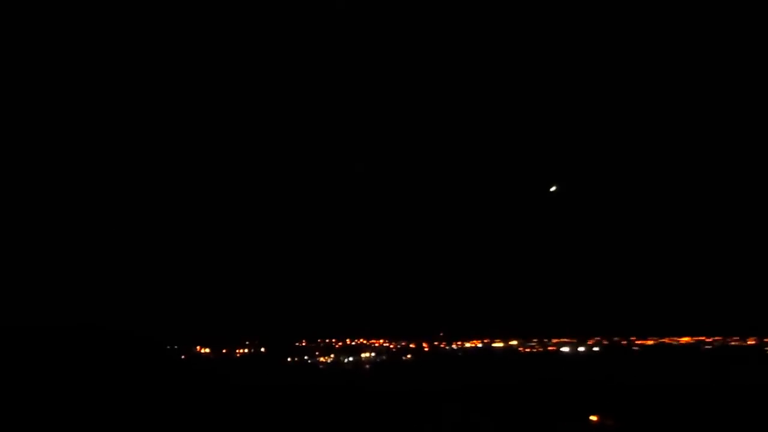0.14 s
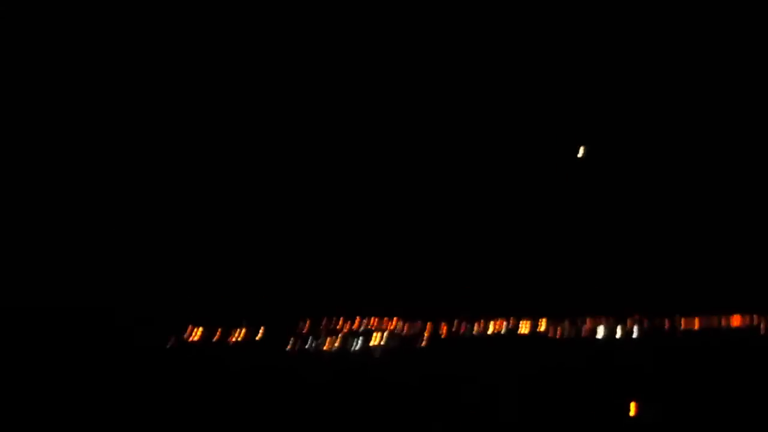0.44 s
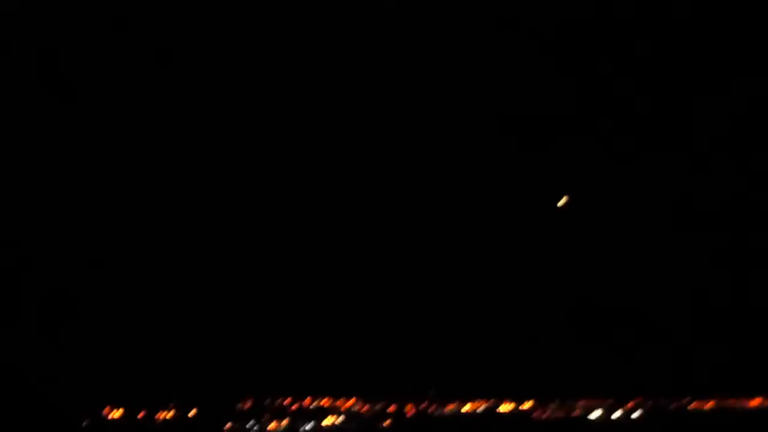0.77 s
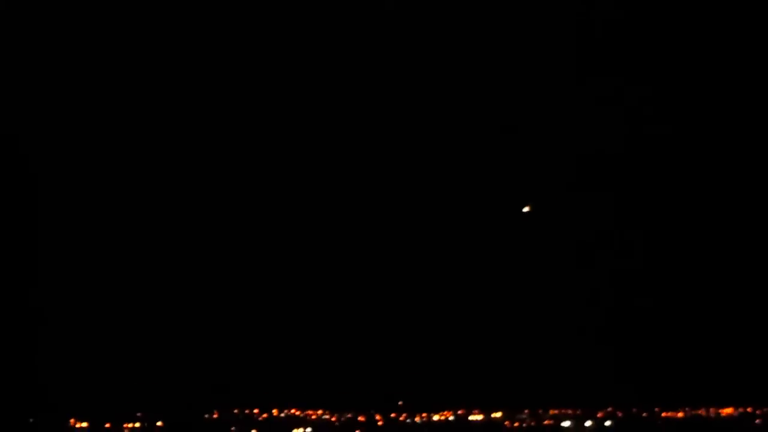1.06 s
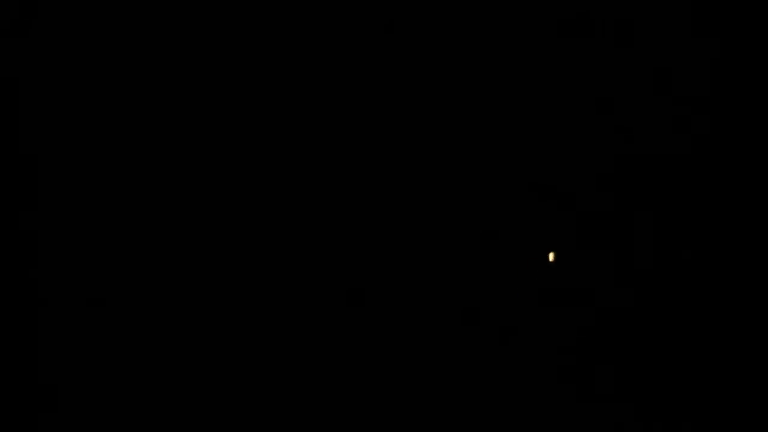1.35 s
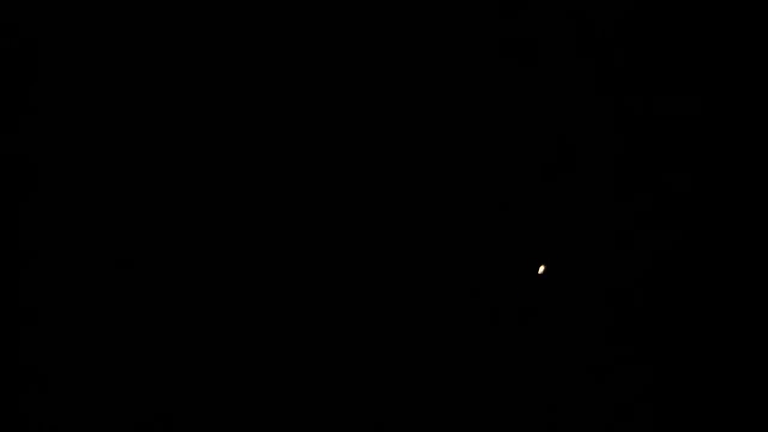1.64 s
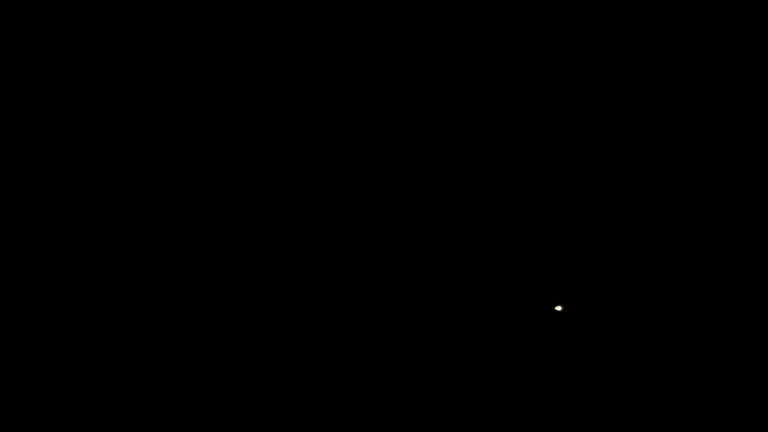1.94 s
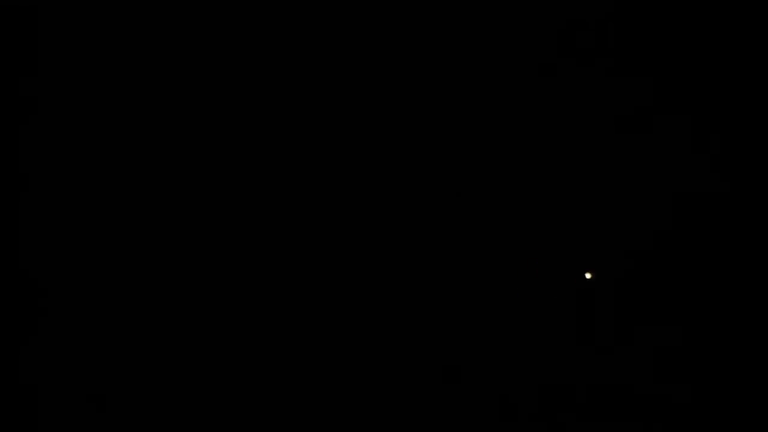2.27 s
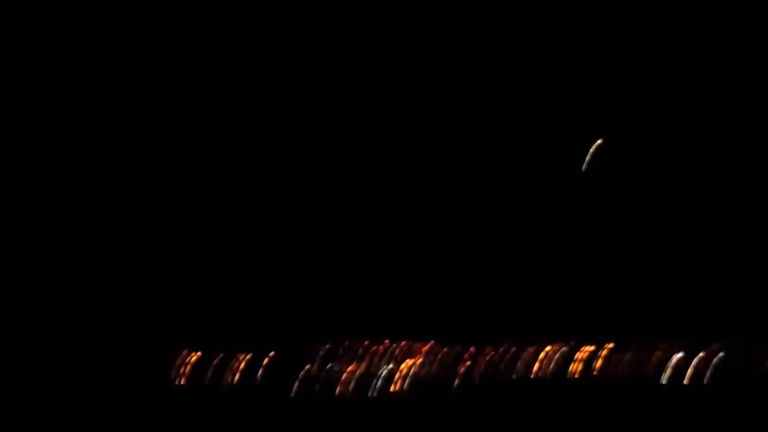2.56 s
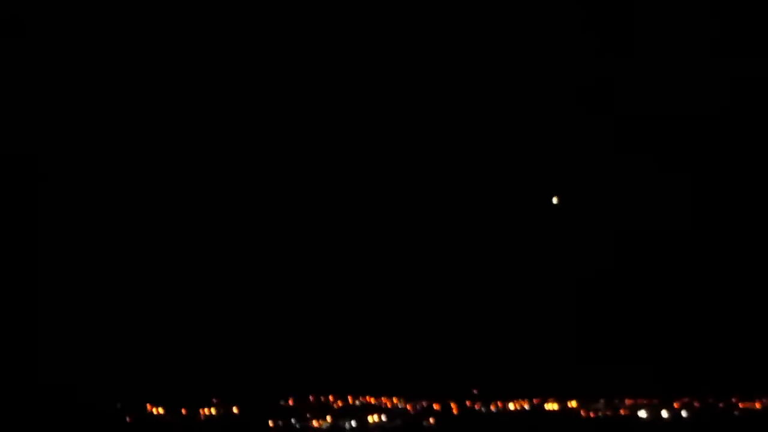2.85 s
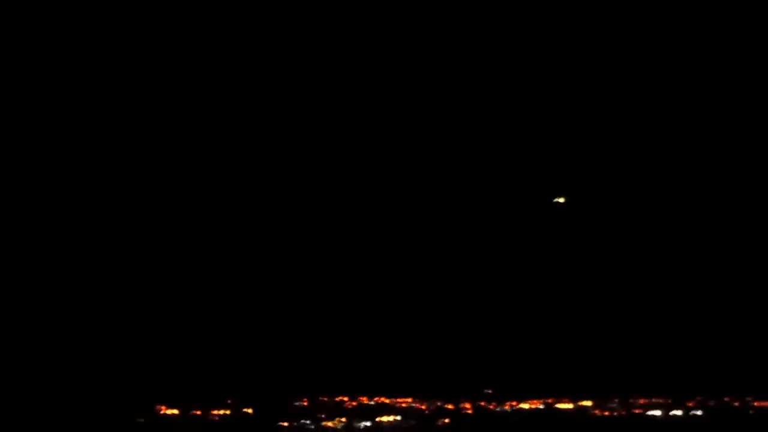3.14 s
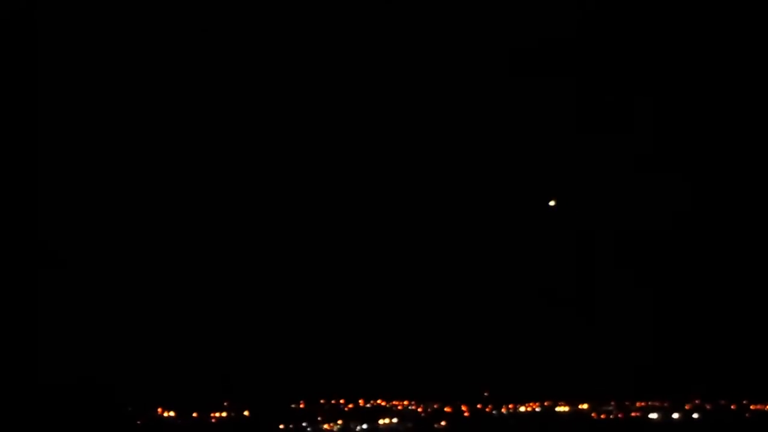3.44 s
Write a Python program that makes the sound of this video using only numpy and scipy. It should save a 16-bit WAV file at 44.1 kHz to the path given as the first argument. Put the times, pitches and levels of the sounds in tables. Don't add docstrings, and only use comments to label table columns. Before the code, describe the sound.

A camera's small zoom motor whirs with a buzzy gear whine among taps and ticks, stops just after one second, then finger taps, a hard knock and a loud latch snap, close on the built-in microphone, quiet hiss behind.

```python
import sys
import numpy as np
from scipy import signal
from scipy.io import wavfile

SR = 44100
rng = np.random.default_rng(int(sys.argv[2]) if len(sys.argv) > 2 else 0)


def level_to_linear(level):
    exponent = np.asarray(level, float) / 20
    return 10 ** exponent


def transcribe(u):
    v = np.clip(np.atleast_2d(u).T, -1, 1)
    q = np.round(v * 32767).astype(np.int16)
    wavfile.write(sys.argv[1], SR, q)


N = 158760

# pitch in Hz, density in dB per Hz.
HISS_COLOUR = [(120, 0.2), (250, -3.5), (600, -9), (1500, -14.5), (4000, -18), (9800, -21), (12000, -31)]
# time in seconds, rumble level in dB.
PALM_LEVEL = [(0, -52.5), (.28, -48.5), (.45, -48), (.7, -46.5), (.85, -45), (1.0, -61), (1.3, -54),
              (1.5, -59), (1.85, -57), (2.05, -56.5), (3.2, -57), (3.32, -51), (3.45, -60), (3.6, -62)]
# time in seconds, level in dB.
MOTOR_LEVEL = [
    (0, -45.5),
    (.35, -47),
    (.65, -45),
    (.8, -44.5),
    (.95, -50),
    (1.1, -45.5),
]
BRUSH_STRENGTH = [-3.3, -5.5, -2, -5, -5.5, -4]
# pitch in Hz, width in Hz, level in dB.
BARREL_MODES = [(317, 270, -4.5), (650, 440, -5.5), (1200, 240, 2.5), (1450, 163, 2), (1890, 310, -1),
                (2985, 290, -3), (3740, 500, -10), (4480, 360, -6.5), (5300, 1000, -13.5),
                (6210, 370, -4.5), (6900, 340, -3.5), (7410, 330, -6), (9200, 2800, -18)]
# start in seconds, end in seconds, level in dB at start, level in dB at end.
GRIP_SQUEEZES = [
    (1.83, 1.944, -55, -61.5),
    (2.92, 3.049, -65, -61),
    (3.068, 3.242, -62.5, -46.5),
]
# start in seconds, level in dB, T60 in seconds.
BODY_RINGS = [
    (.27, -42.5, 0.39),
    (0.768, -43, 0.95),
    (.94, -50.5, 1),
    (1.262, -34, 0.54),
    (2.181, -46, 0.41),
    (2.619, -30, 0.38),
    (3.28, -39.5, 0.37),
    (3.349, -40.5, 0.49),
]
# pitch in Hz, level in dB.
SHELL_MODES = [(330, -5.5), (430, -10), (620, 2), (810, -0.5), (990, -1.5), (1104, -0.7), (1297, 1),
               (1490, -1), (1900, 4)]
# start in seconds, peak in dB, centre in Hz, T60 in seconds, contact in seconds.
FINGER_TAPS = [(.12, -33, 920, .02, 0.0036), (.261, -27.5, 440, 0.034, 0.0079),
               (0.2716, -23, 950, 0.026, 0.0033), (.436, -34.5, 590, .012, 0.00086),
               (0.77, -27, 610, 0.015, .004), (.941, -29.5, 1110, .02, 0.0026),
               (.977, -28, 930, 0.036, 0.0056), (1.2628, -18, 646, 0.042, 0.0035),
               (1.335, -23, 818, 0.019, 0.0085), (1.343, -31.5, 750, 0.046, .05),
               (1.748, -40.5, 700, 0.026, 0.0051), (1.798, -42.5, 583, 0.025, 0.0043),
               (1.889, -32.5, 670, .015, 0.0016), (2.13, -51, 650, .02, 0.0044),
               (2.1807, -23.5, 820, 0.021, 0.0027), (2.6195, -5.5, 1110, 0.016, 0.0041),
               (2.629, -26.5, 887, 0.023, 0.017), (2.649, -30, 825, 0.022, 0.029),
               (2.749, -38, 1070, .015, 0.0049), (3.028, -35.5, 760, 0.023, 0.0024),
               (3.221, -31.5, 960, 0.027, 0.014), (3.2369, -22.5, 1030, 0.073, .012),
               (3.279, -24, 891, 0.034, 0.03), (3.351, -24, 900, 0.024, 0.028)]
SEAM_MODES = [2050, 2696, 3263, 3730, 3930, 4225, 4570, 5860, 6070, 6710, 7870, 8060, 9680, 9440]
# start in seconds, peak in dB, centre in Hz, T60 in seconds.
SHARP_TICKS = [(.250, -16, 3110, 0.0075), (0.2713, -8.5, 3900, 0.013), (0.748, -32, 6000, .01),
               (0.7708, -29, 5660, 0.0076), (.81, -30.5, 5800, 0.009), (.859, -22.5, 6300, .008),
               (1.133, -37.5, 3000, .01), (1.2618, -18, 2600, 0.017), (1.8902, -26, 3770, 0.0077),
               (1.926, -34.5, 3000, 0.011), (2.1805, -17, 2460, 0.012), (2.6196, -17.5, 2730, 0.022),
               (3.028, -36.5, 3970, .012), (3.180, -29, 3520, 0.0073), (3.232, -25, 3000, 0.039),
               (3.3319, -26.5, 3000, 0.01)]


def one(x):
    return x / np.sqrt(np.mean(x ** 2) + 1e-20)


def to_peak(x, db):
    return x * level_to_linear(db) / np.abs(x).max()


def drift(rate_hz):
    r = np.exp(-2 * np.pi * rate_hz / SR)
    return one(signal.lfilter([1], [1, -2 * r, r * r], rng.standard_normal(N + SR))[SR:])


def peak(x, hz, width_hz):
    r = np.exp(-np.pi * width_hz / SR)
    poles = [1, -2 * r * np.cos(2 * np.pi * hz / SR), r * r]
    return signal.lfilter([(1 - r * r) / 2, 0, (r * r - 1) / 2], poles, x)


def band(x, low_hz, high_hz):
    return signal.sosfilt(signal.butter(2, [low_hz, high_hz], "band", fs=SR, output="sos"), x)


def rings(hz, db, t60):
    t = np.arange(int(.08 * SR))[:, None] / SR
    decay = level_to_linear(db - 60 * t / np.maximum(t60, .002))
    return (decay * np.sin(2 * np.pi * hz * t)).sum(axis=1)


def add(out, s, x):
    i = int(s * SR)
    out[i:i + len(x)] += x[:N - i]


def near(hz, centre_hz, octaves):
    return -6 * (np.log2(hz / centre_hz) / octaves) ** 2


def hiss():
    edges = 90 * 2 ** np.arange(0, 7.4, 1 / 6)
    white = rng.standard_normal((2, N))
    hz, db = np.transpose(HISS_COLOUR)
    out = np.zeros(N)
    for k, (low, high) in enumerate(zip(edges, edges[1:])):
        gain = level_to_linear(np.interp(np.log(low * high) / 2, np.log(hz), db))
        out += gain * band(white[k % 2], low, high)
    return level_to_linear(-51) * one(out)


def hand():
    s, db = np.transpose(PALM_LEVEL)
    white = rng.standard_normal((3, N))
    rumble = one(band(white[0], 18, 92)) * level_to_linear(2.6 * drift(6.3))
    rub = level_to_linear(-6 + 2.0 * drift(13)) * one(peak(white[1], 404, 430))
    hum = level_to_linear(-60.5) * one(peak(white[2], 210.4, 9))
    return level_to_linear(np.interp(np.arange(N) / SR, s, db)) * (rumble + rub) + hum


def motor():
    segments, turns_per_s, first_turn_s = 6, 44.37, .0192
    stop_s, coast_s, mesh_hz = 1.106, .006, 1460
    t = np.arange(N) / SR
    turns = (t - first_turn_s) * turns_per_s + .006 * drift(60)
    step = np.floor(turns * segments).astype(int)
    uneven_db = 1.2 * rng.standard_normal(2000)[step % 2000]
    strength = level_to_linear(np.array(BRUSH_STRENGTH)[step % segments] + uneven_db)
    puff = 0.33 + strength * np.exp(-(turns * segments - step) / 0.43)
    clicks = one(strength * np.diff(step, prepend=step[0]))
    brushes = one(puff * rng.standard_normal(N)) + level_to_linear(-4) * clicks
    rotor = one((1 + puff) * rng.standard_normal(N))

    whir = np.zeros(N)
    for k, (hz, width_hz, db) in enumerate(BARREL_MODES):
        source = brushes if hz > 2500 else rotor
        mode = peak(peak(source, hz, width_hz), hz, 4.0 * width_hz)
        whir += level_to_linear(db) * (-1) ** k * mode
    whir = one(whir)
    for hz, tone_db in ((mesh_hz, -11.5), (mesh_hz - segments * turns_per_s, -13.5)):
        level = level_to_linear(tone_db + 2.5 * drift(25))
        whir = whir + level * np.sin(2 * np.pi * hz * t + .6 * drift(5.7))
    s, db = np.transpose(MOTOR_LEVEL)
    return whir * level_to_linear(np.interp(t, s, db)) * np.exp(-np.maximum(t - stop_s, 0) / coast_s)


def creaks():
    slips_per_s, seam_hz, fade_s = 2400, 3910, 0.0093
    t, env = np.arange(N) / SR, np.zeros(N)
    for start, end, start_db, end_db in GRIP_SQUEEZES:
        fade = np.clip(np.minimum(t - start, end - t) / fade_s, 0, 1)
        env += level_to_linear(np.interp(t, [start, end], [start_db, end_db])) * fade
    slips = (rng.random(N) < slips_per_s / SR) * rng.standard_normal(N) * level_to_linear(2.1 * drift(40))
    seam = one(peak(peak(slips, seam_hz, 420), seam_hz, 1500))
    shell = one(peak(slips, 700, 670))
    return env * (seam + level_to_linear(1.5) * shell)


def body_ring():
    out, t = np.zeros(N), np.arange(SR // 2) / SR
    for s, db, t60 in BODY_RINGS:
        rise = 1 - np.exp(-t / 0.0024)
        add(out, s, level_to_linear(db - 60 * t / t60) * rise * np.sin(2 * np.pi * 166.4 * t))
    add(out, 3.345, rings(118, -38, .2) * np.hanning(int(.08 * SR)))
    return out


def tap(centre_hz, t60, length):
    hz, db = np.transpose(SHELL_MODES)
    x, modes = np.zeros(SR // 4), hz * (1 + 0.046 * rng.standard_normal(len(hz)))
    modes[np.argmin(abs(np.log(hz / centre_hz)))] = centre_hz
    struck_db = db + 7 * (modes == centre_hz)
    for k in range(10):
        share = k / 7
        timing, loudness = rng.standard_normal(2)
        touch_db = 1.7 * loudness - 11 * share + 3.86 * rng.standard_normal(len(hz))
        dull_db = near(modes, centre_hz * (1 - 0.42 * share), 0.7)
        touch = np.sign(timing) * rings(modes, struck_db + touch_db + dull_db, t60)
        add(x, abs(length * share * (1 + .1 * timing)), touch)
    return band(x, 220, 3000)


def taps():
    out = np.zeros(N)
    for s, peak_db, centre_hz, t60, length in FINGER_TAPS:
        add(out, s, to_peak(tap(centre_hz, t60, length), peak_db))
    return out


def tick(db, centre_hz, octaves, t60):
    hz = np.array(SEAM_MODES)
    scatter, strength = rng.standard_normal((2, len(hz)))
    modes = hz * (1 + 0.023 * scatter) * np.sign(strength)
    mode_db = db + near(hz, centre_hz, octaves) + 4.3 * strength
    x = rings(modes, mode_db, t60 * (4000 / hz) ** 0.52)
    x += rings(centre_hz, db + 8.0, t60)
    grit = rng.standard_normal(40)
    x[:37] += level_to_linear(db - 5.5) * (grit[3:] - grit[:-3]) * np.exp(-np.arange(37) / 35.0)
    return x


def latch():
    x, rattle_s, loss_db = np.zeros(SR // 4), .018, 27.5
    for k in range(14):
        share = (k / 13) ** 1.4
        db = 2.0 * rng.standard_normal() - loss_db * share
        add(x, rattle_s * share, tick(db, 4890, 0.9, 0.01))
    return to_peak(x, -1)


def ticks():
    out = np.zeros(N)
    for s, db, hz, t60 in SHARP_TICKS:
        add(out, s, to_peak(tick(0, hz, 1.22, t60), db))
    add(out, 3.2386, latch())
    return signal.sosfilt(signal.butter(2, 700, "high", fs=SR, output="sos"), out)


def scene():
    return (hiss() + hand() + motor() + creaks() + body_ring() + taps() + ticks())[None]


def band_limit(x):
    return signal.sosfilt(signal.butter(12, 13860, fs=SR, output="sos"), x)


def record(dry):
    notched = dry - 0.68 * peak(dry, 11010, 1550)
    x = signal.sosfilt(signal.butter(10, 12070, fs=SR, output="sos"), notched)
    return band_limit(x)


dry = scene()
out = record(dry)
transcribe(out)
```